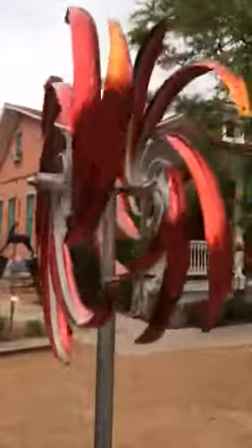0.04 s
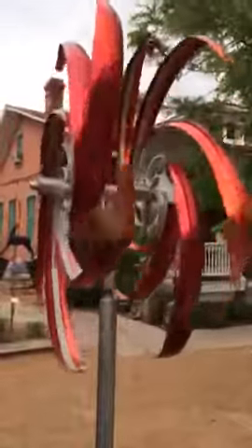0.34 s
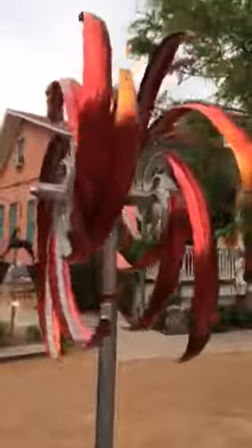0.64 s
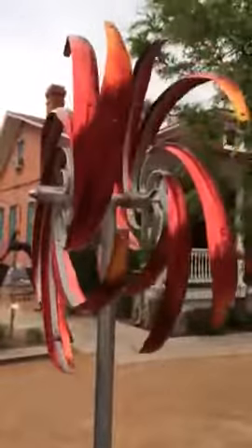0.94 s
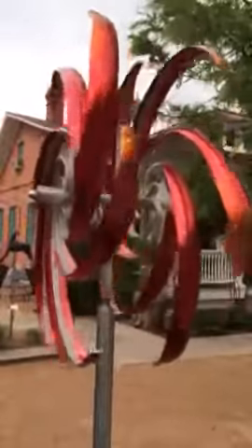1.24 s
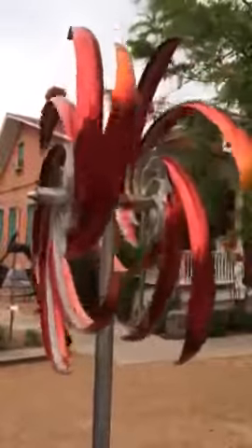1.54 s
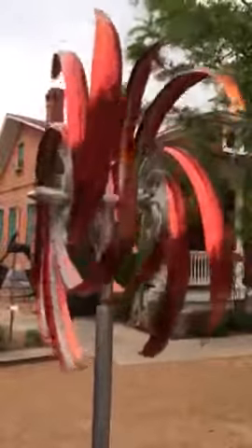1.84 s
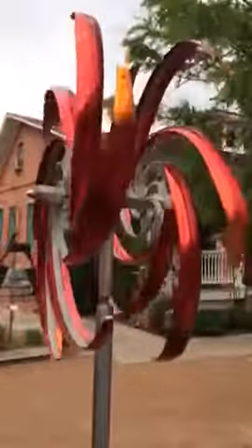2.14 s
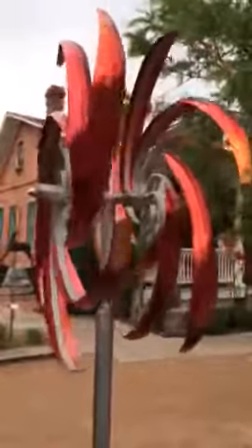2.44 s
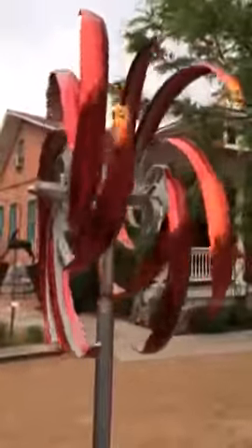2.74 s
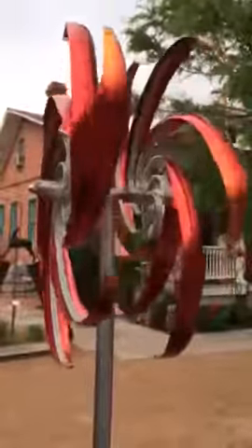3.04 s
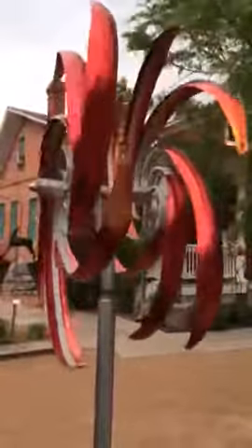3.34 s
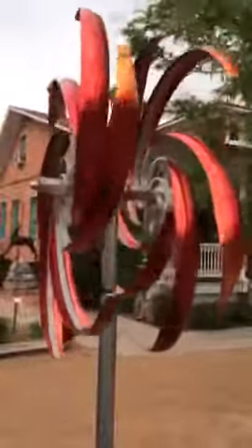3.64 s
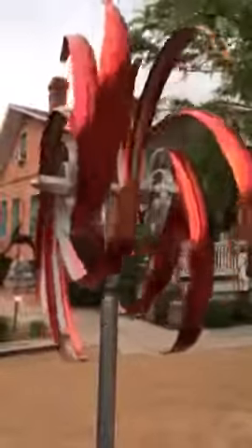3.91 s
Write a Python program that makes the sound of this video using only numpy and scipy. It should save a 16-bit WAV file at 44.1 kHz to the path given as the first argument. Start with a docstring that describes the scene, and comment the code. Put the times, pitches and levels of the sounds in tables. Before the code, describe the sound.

Small birds cheep and twitter in a yard, with soft wind and far traffic behind.

```python
"""Sparrows in a front yard.

Two-syllable calls, arched cheeps and softer twitters from further off: gliding whistles from the
two sides of the syrinx, echoing off house and trees. Light wind bumps the microphone over the
hush and drone of far traffic. Something rustles briefly."""
import sys
import numpy as np
from scipy import signal
from scipy.fft import rfft, irfft
from scipy.io import wavfile

SR = 44100
rng = np.random.default_rng(int(sys.argv[2]) if len(sys.argv) > 2 else 0)


def persist_wave(psi):
    """Save psi, clipped to +-1, as 16-bit WAV."""
    counts = np.round(np.clip(psi, -1, 1) * 32767).astype(np.int16)
    wavfile.write(sys.argv[1], SR, np.atleast_2d(counts).T)


N = 176400
T = np.arange(N) / SR

# first syllables: downstroke_s, level_db, pitch_hz, lead_in_db
OPENINGS = [(.249, -42.5, 5510, -1), (.882, -45, 5380, 4.5), (1.534, -41, 5490, -2.5),
            (2.030, -44.5, 5550, -4), (2.553, -43, 5480, -2.5), (3.404, -41.5, 5542, -3),
            (3.986, -50.5, 5570, 14.5)]
# notes that rise and fall: top_s, level_db, pitch_hz
CLOSINGS = [(.333, -40, 4228), (.970, -43.5, 4010), (1.621, -37.5, 4383), (2.116, -39.5, 4339),
            (2.641, -42, 4324), (3.484, -37.5, 4307)]
CHEEPS = [(.481, -42, 5150), (1.156, -42.5, 5020), (2.383, -43, 5060)]
TWITTERS = [(.565, -48.5, 4060), (.66, -52.5, 5280), (.72, -47.5, 5390), (1.237, -46, 4230),
            (1.91, -57.5, 5200), (2.455, -47.5, 4040), (2.753, -52.5, 5180), (2.818, -52.5, 5587),
            (2.864, -54.5, 5450), (3.749, -45, 5220), (3.812, -48.5, 5350)]
SLURS = [(1.29, -53, 4323), (3.268, -55, 4514)]
# thin held notes: centre_s, level_db, pitch_hz
WHISTLES = [(.1, -64, 6200), (1.963, -53.5, 5270), (2.338, -47, 5320)]
# contours relative to each note: offset_s, pitch_ratio, fundamental_db, octave_db
OPENING_SHAPE = [(-.1, .55, -31, -28), (-.072, .585, -21, -16), (-.046, .66, -13, -12),
                 (-.037, .78, -8, -26), (-.028, .985, -2, -34), (-.015, 1, -1, -34), (-.006, .97, -3, -35),
                 (.002, .76, 1, -38), (.013, .49, -17, -42)]
CLOSING_SHAPE = [(-.055, .64, -24, -36), (-.034, .78, -11, -25), (-.013, .95, -4, -28), (0, 1, 1, -27),
                 (.006, .93, -3, -27), (.015, .68, -19, -33)]
CHEEP_SHAPE = [(-.023, .68, -12.5, -34), (-.012, .92, -2, -30), (0, 0.97, 4, -19), (.007, 0.86, -3.5, -38),
               (.015, .73, -8, -20), (0.029, .6, -12, -35)]
TWITTER_SHAPE = [(-.03, .7, -12, -40), (-.012, .88, -4, -34), (0, 1, 0, -30), (.009, .94, -1, -32),
                 (.015, .72, -3, -36), (.028, .7, -13, -42)]
SLUR_SHAPE = [(-.05, .63, -13, -45), (-.022, .82, -6, -42), (0, 1, 0, -38), (.03, .89, 0, -40),
              (.062, .75, -6, -45)]
WHISTLE_SHAPE = [(-.022, 1.1, -21, -40), (-.008, 1, -3, -28), (0.013, 1, -3, -33), (0.026, 2.1, -36, -39)]
SECOND_SIDE_RISE = [(.002, .93, -17, -45), (.011, .81, -8, -40), (.027, .88, -6, -38), (.042, 1, -20, -45)]   # other side of the syrinx, after the downstroke
SECOND_SIDE_FALL = [(-.092, 1.45, -23, -45), (-.076, 1.39, -15, -38), (-.052, 1.27, -14, -36),
                    (-.031, 1.09, -11, -32), (-.018, 1.16, -16, -36)]   # other side, leading into a cheep
# breathy onsets of the calls: centre_s, level_db, sigma_s
HISSES = [(.17, -55.5, 0.033), (.44, -57.5, 0.033), (1.125, -55, 0.051), (1.47, -57, 0.034),
          (1.97, -56.5, 0.031), (2.335, -56.5, 0.038), (2.48, -64, 0.043), (3.75, -60, 0.04)]
# eddies at the microphone: centre_s, level_db, pitch_hz
BUMPS = [(0.023, -32.5, 69), (0.087, -42.5, 42.7), (.707, -31.5, 78), (1.621, -32, 86.5),
         (1.837, -34.5, 95), (1.938, -34, 80), (2.407, -34.5, 75), (2.508, -34.5, 81),
         (3.012, -37.5, 108.1), (3.033, -40, 100), (3.662, -31.5, 88), (3.821, -40, 55.94)]
# breeze strength: time_s, level_db
BREEZE = [(0, -50), (.15, -58), (.6, -57.5), (.9, -55.5), (1.15, -63), (1.4, -52), (2.0, -55.5),
          (2.25, -58), (2.5, -55.5), (2.85, -59.5), (3.05, -55.5), (3.3, -54.5), (3.75, -55), (3.95, -66.5)]
# rustle bursts: start_s, level_db, decay_s
RUSTLES = [(.829, -49, 0.069), (0.878, -57, 0.038), (1.968, -56, .05)]
# traffic drone: time_s, pitch_hz, level_db
DRONE = [(0, 209.1, -60.5), (.25, 225, -50), (.7, 221.7, -48.5), (1.02, 211.6, -54.5), (1.2, 239.9, -45),
         (1.5, 225.3, -54), (2.0, 190.1, -50.5), (2.5, 175.2, -51.5), (3.2, 143.7, -54.5),
         (3.9, 141.5, -57)]
# faint high hiss: time_s, level_db
TREBLE = [(0, -67), (.6, -63.5), (1.3, -68.5), (1.85, -69.5), (2.2, -68), (2.7, -64), (3.1, -72),
          (3.6, -66.5), (3.95, -63)]
# noise spectra: freq_hz, gain_db
HISS_SPECTRUM = [(2000, -18), (3200, 4.5), (4500, 9.5), (5400, 7.5), (7000, -4.5), (8500, -10), (11000, -9),
                 (15000, -19)]
BUMP_SPECTRUM = [(35, -13), (70, 6), (140, 13), (220, -19.5), (400, -36), (900, -60)]
WIND_SPECTRUM = [(32, -18), (42, -7.5), (60, -3), (110, -5), (170, -6), (330, -29.5), (900, -59)]
RUSTLE_SPECTRUM = [(900, -22), (1600, -4.5), (2400, 1), (3500, -6), (5000, -4), (8000, -27), (15000, -27)]
HUSH_SPECTRUM = [(150, -37.5), (250, -4), (433, -9), (589, -10), (1190, -12.5), (1460, -15.5), (1890, -18),
                 (2020, -19.5), (2360, -20.5), (3270, -29), (6050, -39), (15000, -43.5)]

CLEAR_JITTER, ARCH_JITTER, BUZZ_JITTER = .007, .014, .034   # rms share of the pitch
WALL_DELAY_S, WALL_DB, YARD_T60_S = .009, -13, .33


def sparrows():
    """Near birds with a wall echo; far birds with more of the yard."""
    near = (syrinx(OPENINGS, OPENING_SHAPE, ARCH_JITTER, third_db=-19.5)
            + syrinx(OPENINGS, SECOND_SIDE_RISE, BUZZ_JITTER, third_db=-12)
            + syrinx(CLOSINGS, CLOSING_SHAPE, CLEAR_JITTER, third_db=-8, rasp_db=-14)
            + syrinx(CHEEPS, CHEEP_SHAPE, ARCH_JITTER, third_db=-25.5)
            + syrinx(CHEEPS, SECOND_SIDE_FALL, BUZZ_JITTER, third_db=-15, rasp_db=-2)
            + syrinx(WHISTLES, WHISTLE_SHAPE, CLEAR_JITTER, third_db=-15))
    far = (syrinx(TWITTERS, TWITTER_SHAPE, BUZZ_JITTER, third_db=-22)
           + syrinx(SLURS, SLUR_SHAPE, ARCH_JITTER, third_db=-15))
    direct = near + call_hiss() + from_db(-3) * far
    wall = from_db(WALL_DB) * np.interp(T - WALL_DELAY_S, T, near)
    return direct + wall + yard_echoes(from_db(-6.5) * near + from_db(-5) * far)


def syrinx(notes, shape, jitter, third_db, rasp_db=-6, jitter_hz=296, flutter_db=.5, edge_s=.003):
    """One gliding whistle per note: three harmonics, noisy skirt. third_db is relative to the octave."""
    out = np.zeros(N)
    for at_s, level_db, pitch_hz, *lead_in_db in notes:
        span = (T > at_s + shape[0][0] - edge_s) & (T < at_s + shape[-1][0] + edge_s)
        t = T[span] - at_s
        ratio, fundamental_db, octave_db = curves_at(shape, t)
        glide_hz = pitch_hz * ratio * (1 + jitter * drift(jitter_hz, len(t)))
        phase = 2 * np.pi * np.cumsum(glide_hz) / SR
        harmonics_db = (fundamental_db, octave_db, octave_db + third_db)
        tone = sum(from_db(db) * np.exp(1j * k * phase) for k, db in enumerate(harmonics_db, 1))
        rasp = 1 + from_db(rasp_db) * skirt(half_width_hz=476, size=len(t))
        fade = np.clip(np.minimum(t - t[0], t[-1] - t) / edge_s, 0, 1)
        lead_db = np.interp(t, (-.048, -.024), [sum(lead_in_db), 0])   # openings only
        effort_db = level_db + lead_db + flutter_db * drift(jitter_hz, len(t))
        out[span] += (tone * rasp).imag * fade * from_db(effort_db)
    return out


def call_hiss(grit_db=1.5):
    """Uneven airy puffs that open the calls."""
    return swells(HISSES) * uneven_noise(HISS_SPECTRUM, grit_db, rate_hz=65.3)


def yard_echoes(x, echoes_per_s=1500):
    """Scattered reflections from house and trees, dying away."""
    t = T[:SR]
    reflections = rng.standard_normal(SR) * (rng.random(SR) < echoes_per_s / SR)
    response = reflections * from_db(-60 * t / YARD_T60_S) * (t > WALL_DELAY_S)
    return signal.fftconvolve(x, response / np.linalg.norm(response))[:N]


def wind(gain_db=2.5, churn_db=-10.5, sigma_cycles=.38):
    """Lumpy rumble, plus single eddies that each give one swing of pressure."""
    breeze_db, = curves_at(BREEZE, T)
    out = from_db(breeze_db + gain_db) * uneven_noise(WIND_SPECTRUM, swing_db=2, rate_hz=16)
    churn = from_db(churn_db) * noise(BUMP_SPECTRUM)
    for centre_s, level_db, pitch_hz in BUMPS:
        envelope = swells([(centre_s, level_db, sigma_cycles / pitch_hz)])
        out += envelope * (np.sin(2 * np.pi * pitch_hz * (T - centre_s)) + churn)
    return out


def rustles():
    """Grainy bursts: sudden start, exponential decay."""
    envelope = sum(from_db(level_db) * (T > start_s) * np.exp(-np.abs(T - start_s) / decay_s)
                   for start_s, level_db, decay_s in RUSTLES)
    return envelope * uneven_noise(RUSTLE_SPECTRUM, swing_db=1.1, rate_hz=150)


def traffic(drone_gain_db=-1.5, hush_db=-56):
    """Far traffic: low wandering drone and wide hush; with it, a faint high hiss of leaves and distant sparrow
    chatter."""
    pitch_hz, drone_db = curves_at(DRONE, T)
    treble_db, = curves_at(TREBLE, T)
    carrier = np.exp(2j * np.pi * np.cumsum(pitch_hz) / SR)
    drone = unit_rms((skirt(half_width_hz=71, size=N) * carrier).real)
    return (from_db(drone_db + drone_gain_db) * drone
            + from_db(hush_db) * noise(HUSH_SPECTRUM)
            + from_db(treble_db) * noise(HISS_SPECTRUM))


def noise(spectrum):
    """Unit-rms shaped noise, rolled off below the first spectrum point."""
    freq_hz, gain_db = np.transpose(spectrum)
    bins_hz = np.arange(N // 2 + 1) * SR / N + 1e-3
    gain = from_db(np.interp(np.log(bins_hz), np.log(freq_hz), gain_db))
    low_cut = np.minimum(bins_hz / freq_hz[0], 1) ** 2
    return unit_rms(irfft(rfft(rng.standard_normal(N)) * gain * low_cut, N))


def uneven_noise(spectrum, swing_db, rate_hz):
    """Unit-rms shaped noise with a wavering level."""
    return unit_rms(noise(spectrum) * from_db(swing_db * drift(rate_hz)))


def skirt(half_width_hz, size):
    """Slow complex noise, unit rms; times a carrier it gives a steep-sided band."""
    padded = size + SR // 10
    white = rng.standard_normal(padded) + 1j * rng.standard_normal(padded)
    lowpass = signal.butter(4, half_width_hz, fs=SR, output="sos")
    return unit_rms(signal.sosfilt(lowpass, white)[-size:])


def drift(rate_hz, size=N):
    """Smooth random wander, unit rms."""
    pole = np.exp(-2 * np.pi * rate_hz / SR)
    white = rng.standard_normal(size + SR // 10)
    return unit_rms(signal.lfilter([1], [1, -2 * pole, pole * pole], white)[-size:])


def swells(rows):
    """Sum of Gaussian envelopes."""
    return sum(from_db(level_db) * np.exp(-.5 * ((T - centre_s) / sigma_s) ** 2)
               for centre_s, level_db, sigma_s in rows)


def curves_at(rows, t):
    """Each value column interpolated at times t."""
    time_s, *columns = np.transpose(rows)
    return [np.interp(t, time_s, column) for column in columns]


def from_db(db):
    """Decibels to gain."""
    return 10 ** (np.asarray(db) / 20)


def unit_rms(x):
    """Scale to unit rms."""
    return x / np.sqrt(np.mean(np.abs(x) ** 2) + 1e-20)


def scene():
    """All sources at one microphone."""
    return (sparrows() + rustles() + wind() + traffic())[None]


def record(dry):
    """Steep treble cut."""
    cutoff_hz = 15250
    return signal.sosfilt(signal.ellip(12, .1, 80, cutoff_hz, fs=SR, output="sos"), dry)


dry = scene()
out = record(dry)
persist_wave(out)
```